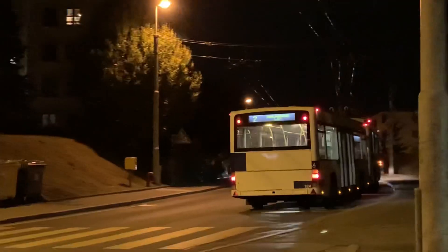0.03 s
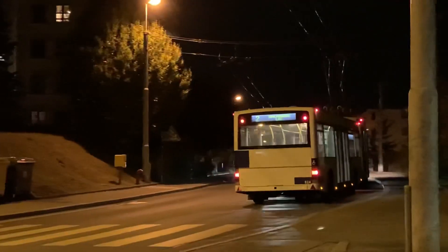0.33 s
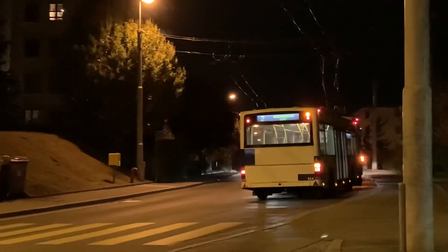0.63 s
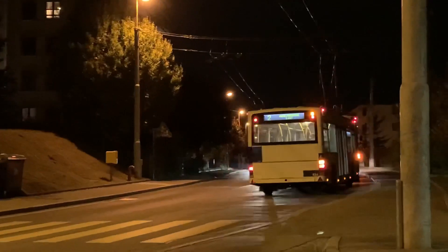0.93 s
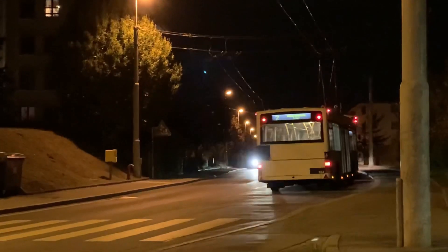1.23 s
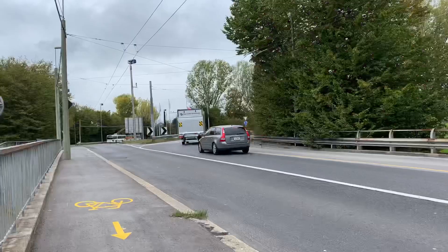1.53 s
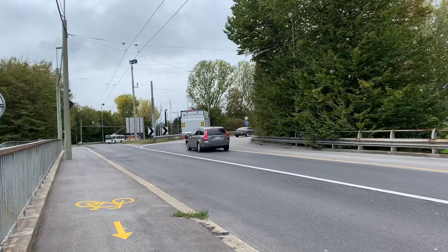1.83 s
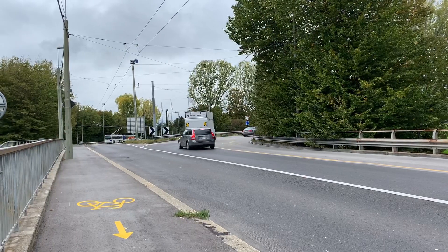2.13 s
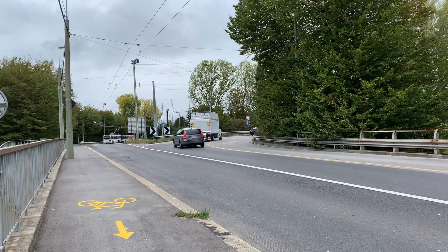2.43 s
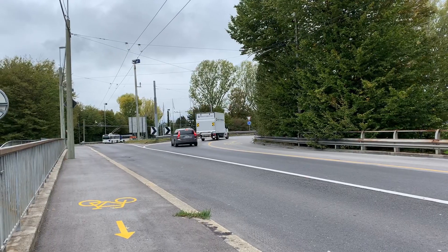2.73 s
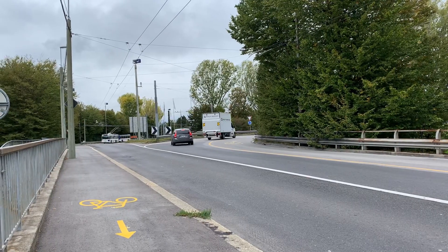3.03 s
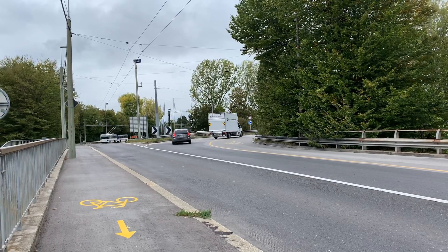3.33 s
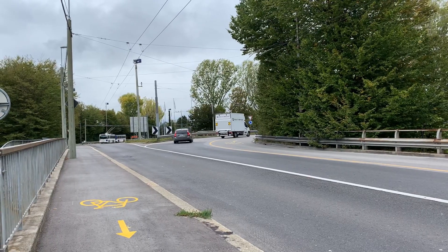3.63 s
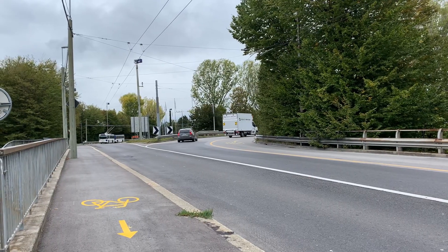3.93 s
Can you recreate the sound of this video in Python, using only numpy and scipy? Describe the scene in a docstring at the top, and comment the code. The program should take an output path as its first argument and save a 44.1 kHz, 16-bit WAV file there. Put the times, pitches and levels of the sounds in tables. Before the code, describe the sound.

Vehicles drive away from a listener at the roadside: first a trolleybus, humming and hissing with a high whine and swelling motor tones, then, after an abrupt cut, a louder car and truck with rumbling engines and slowly receding tyres.

```python
"""A low rumble and hum at night: a trolleybus pulls away, heard from the pavement, with tyre wash,
swelling motor tones, drive hiss and a thin inverter whine. A short silence follows.
Then, by day, a car and a box truck drive off: receding tyre roar over engine drones, road rumble,
a hollow boom and fine hiss. Rumble, roar and hiss are shaped stereo noise; engines are harmonics
of a firing rate; the electric drive is a set of wavering sines."""
import sys
import numpy as np
from scipy import signal
from scipy.fft import rfft, irfft
from scipy.io import wavfile
from scipy.ndimage import uniform_filter1d

SR = 44100
rng = np.random.default_rng(int(sys.argv[2]) if len(sys.argv) > 2 else 0)


def output_pcm(signal):
    """Save a mono or channel-first signal as 16-bit PCM at the path in sys.argv[1].

    Samples are clipped to [-1, 1] before scaling.
    """
    pcm = np.clip(np.atleast_2d(signal).T, -1, 1) * 32767
    wavfile.write(sys.argv[1], SR, np.round(pcm).astype(np.int16))


N = 176400
T = np.arange(N) / SR
NIGHT_END_S, DAY_START_S = 1.274, 1.349
LOW_CUT_HZ, HIGH_CUT_HZ = 37, 14300

# noise spectra (frequency [Hz], relative density [dB])
BUS_RUMBLE_SPECTRUM = [(15, -42), (28, -30), (50, -3.5), (80, 1), (125, -2.5), (155, -5.5), (200, -8),
                       (340, -14), (450, -24), (900, -33), (3000, -76)]
BUS_TYRE_SPECTRUM = [(150, -20), (450, -8.5), (720, 1.5), (860, -1), (1060, -9.5), (1250, -1), (1430, -5),
                     (1750, -10.5), (2150, -10.5), (2450, -16), (3600, -13.5), (4300, -16), (8000, -25.5),
                     (14000, -61)]
DRIVE_HISS_SPECTRUM = [(1500, -39), (2500, -5.5), (3000, 3), (3700, 3), (4100, -5.5), (5000, -14),
                       (6400, -7.5), (8500, -11), (10600, -9), (11600, -35), (13300, -18), (14300, -34)]
ROAD_RUMBLE_SPECTRUM = [(15, -29), (28, -20), (36, 1.5), (60, 5.5), (100, 1), (150, -1.5), (200, -5.5),
                        (290, -5), (360, -6.5), (470, -14), (700, -20.5), (2000, -64.5)]
TYRE_ROAR_SPECTRUM = [(150, -23), (450, -12.5), (640, -0.5), (850, -0.5), (1020, 0), (1220, -1),
                      (1400, -1.5), (1620, -2), (1870, -3), (2150, -5.5), (2480, -9), (2660, -9.5),
                      (2880, -12.5), (3120, -12.5), (3800, -16.5), (4150, -15.5), (4800, -24),
                      (7000, -27.5), (14000, -62)]
TREAD_RING_SPECTRUM = [(950, -47), (1150, 0), (1340, 0), (1500, -12), (1700, -6), (1870, 0), (2100, -20),
                       (2600, -52), (5000, -85)]
FAR_ROAR_SPECTRUM = [(250, -34), (450, 3), (530, -1), (620, -10), (1000, -11), (1800, -59)]
FINE_HISS_SPECTRUM = [(1500, 0), (3500, 1.5), (6200, 7), (7300, -1.5), (8200, 8.5), (9100, 1.5),
                      (10500, 5.5), (11500, -18), (13400, -0.5), (14300, -22)]
BOOM_SPECTRUM = [(100, -23), (150, -0.5), (215, -0.5), (275, 3.5), (330, -5.5), (450, -35), (1200, -92)]
# stereo fields (frequency [Hz], coherence [0-1], left lead [rad], left-right [dB])
NIGHT_FIELD = [(100, 0.99, -0.39, -0.5), (300, 0.91, 0.25, -4), (520.2, 0.5, 0, 3.5), (800, .75, 0.1, -1.5),
               (1050, .1, -0.15, 4.5), (1350, 0.84, -0.15, 0), (1690, 0.43, -1.5, 0.5),
               (2100, .6, -0.33, -.5), (2610, 0.32, -0.79, -1), (3400, .25, 0.47, 2.5),
               (3900, 0.26, -0.08, 0), (5200, .2, -2.2, -1.5), (6460, .35, 0, -1.5),
               (9000, 0.32, -2.2, -.5), (10900, 0.27, 0.91, 0)]
DAY_FIELD = [(80, 0.99, 0.2, 0.5), (180, 0.82, 0.2, -1), (294, 0.67, -0.74, -1.7), (447, 0.11, 0.57, 1),
             (534, 0.13, 2, 0.8), (857, 0.25, 2, 0.5), (1020, 0.39, 3.5, 4), (1186, 0.12, 1, 5.5),
             (1380, 0.19, 0, 6), (1490, 0.69, 2.5, 1), (1860, .33, 1.6, -1), (2220, 0.19, 2.5, 2.5),
             (2660, 0.28, -0.7, -0.5), (3160, 0.5, 4.5, 1), (4200, 0.4, 5.5, 0), (5300, 0.099, 7.5, -1.5),
             (7140, 0.34, 8, -1), (8000, 0.17, 7, -5.5), (9030, 0.23, 3, -.4), (10040, 0.54, 7, 0),
             (13300, 0.55, 7, 0)]
# hum, engine and drone tracks (time [s], fundamental [Hz], base level [dB])
BUS_HUM_TRACK = [(0, 63.4, -46), (.35, 63.1, -47.5), (.5, 62.3, -50), (.75, 62.1, -49), (1.27, 61.4, -55)]
TRUCK_TRACK = [(1.35, 62.44, -32), (1.55, 62.34, -36.5), (1.85, 63.12, -39.5), (2.3, 66.23, -34),
               (2.7, 67.4, -39), (3.1, 69.86, -39), (3.55, 73.2, -35), (3.75, 72.97, -40.5), (4, 71, -36)]
CAR_TRACK = [(1.35, 96.6, -54), (1.7, 93.1, -41.5), (2.05, 91.03, -39.5), (2.5, 88.17, -50.5),
             (2.9, 94, -37), (3.2, 92.92, -37.5), (3.55, 87.83, -42), (4, 86.8, -37.5)]
LOW_DRONE_TRACK = [(1.35, 318, -48), (1.8, 314, -59), (2.2, 314.7, -52), (2.7, 315.3, -54),
                   (2.9, 315.9, -42.5), (3.15, 317.6, -52.5), (3.42, 318, -41.5), (3.6, 319, -55.5),
                   (3.76, 324, -43), (4, 317, -54)]
HIGH_DRONE_TRACK = [(1.35, 402, -56), (1.65, 376, -53), (1.9, 380, -68), (2.15, 425, -66),
                    (2.35, 426, -55.5), (2.8, 424, -61), (3.2, 422, -54), (4, 424, -56)]
# harmonics (multiple, gain [dB])
BUS_HUM_ORDERS = [(1, -9), (2, -1.5), (3, -7.5)]
TRUCK_ORDERS = [(1, 0), (2, -18), (3, -16), (4, -20.5), (5, -21)]
CAR_ORDERS = [(1, -0.5), (2, -18.5), (3, -16.5), (4, -20)]

# bus noise levels (time [s], rumble [dB], tyres [dB], hiss [dB])
BUS_LEVELS = [(0, -44, -51, -61.5), (.15, -40, -51, -57.5), (.35, -43, -50, -58.5),
              (.65, -42.5, -49.5, -56), (.8, -42, -51.5, -59), (.98, -43, -51.5, -61),
              (1.1, -42.5, -51, -62), (1.27, -45, -52.5, -65)]
# traction motor tones (frequency [Hz], base level [dB])
MOTOR_TONES = [(286, -57.5), (431, -63), (495, -62.5), (577, -58.5), (802, -72)]
# their swell (time [s], gain [dB])
MOTOR_SWELL = [(.9, -25), (1.02, -4.5), (1.1, 2), (1.27, -1.5)]
# inverter main tone (time [s], level [dB])
INVERTER_LEVEL = [(0, -58.5), (.07, -65), (.17, -59), (.3, -59), (.45, -65), (.57, -62.5), (.66, -66),
                  (.73, -62), (.93, -62), (1.05, -72), (1.27, -72)]
# drive tones (frequency [Hz], start level [dB], slope [dB/s], left-right [dB], left lead [rad])
DRIVE_TONES = [(2994, -70.5, -2, 3, 0.47), (3460, -73, -8, 5, 1), (3640, -71, -3, 4, -0.88),
               (6492, -76, -4, 0, 0)]
# switching tones (frequency [Hz], level re drive hiss [dB])
SWITCHING_TONES = [(7420, -27), (7641, -29), (10201, -26), (10700, -24), (10890, -21)]

# traffic noise levels (time [s], rumble [dB], tyres [dB], tyre tilt [dB/octave], hiss [dB])
TRAFFIC_LEVELS = [(1.35, -30, -36.5, -0.5, -57.5), (1.6, -31.5, -37.5, -0.9, -59.5),
                  (1.9, -32, -37.5, -1, -60), (2.25, -30, -40, 0.5, -62.5), (2.6, -31, -40.5, -1.05, -60),
                  (2.9, -32, -40, -1.5, -61), (3.3, -31, -42, -0.6, -60.5),
                  (3.44, -34.5, -41.5, -1.5, -57.5), (3.6, -32, -40.5, -1.5, -60.5),
                  (3.76, -32, -41, -1.6, -58), (4, -32, -41.5, -0.6, -62.5)]
# treads and far traffic (time [s], ring [dB], far roar [dB])
RING_AND_FAR_LEVELS = [(1.35, -44.5, -62), (1.9, -44.5, -55), (2.3, -46.5, -58), (2.65, -48.5, -61),
                       (3, -52.5, -54), (4, -64, -54.5)]
# vehicle boom (time [s], level [dB])
BOOM_LEVEL = [(1.35, -48), (1.85, -47), (2.25, -41.5), (2.55, -43), (2.8, -49.5), (4, -47)]


def amp(db):
    """Decibels to gain."""
    return 10 ** (np.asarray(db) / 20)


def unit(x):
    """Scale to rms 1."""
    return x / np.sqrt(np.mean(abs(x) ** 2) + 1e-20)


def over_hz(table, hz):
    """Table columns interpolated over log frequency."""
    knots_hz, *columns = np.transpose(table)
    return [np.interp(np.log(hz + 1), np.log(knots_hz + 1), c) for c in columns]


def over_time(table):
    """Table columns interpolated over T."""
    knots_s, *columns = np.transpose(table)
    return [np.interp(T, knots_s, c) for c in columns]


def wander(rate_hz):
    """Slow random motion, rms 1."""
    hz = np.fft.rfftfreq(N, 1 / SR)
    return unit(irfft(rfft(rng.standard_normal(N)) * np.exp(-(hz / rate_hz) ** 2), N))


def noise(spectrum, field, patchy_db, tilt_db_oct=0 * T, size=2048):
    """Shaped stereo noise, rms 1, with drifting spectral patches and a tilt about 1 kHz."""
    hop = size // 4
    frames, hz = N // hop + 5, np.fft.rfftfreq(size, 1 / SR)
    a, b, c, d, patches = rng.standard_normal((5, frames, len(hz)))
    patches = unit(uniform_filter1d(uniform_filter1d(patches, size=10, axis=0), size=9, axis=1))
    coherence, lead_rad, balance_db = over_hz(field, hz)
    left, diffuse = a + 1j * b, c + 1j * d
    right = (coherence * left + np.sqrt(1 - coherence ** 2) * diffuse) * np.exp(-1j * lead_rad)
    octaves = np.log2(np.maximum(hz, 200) / 1000)
    tilt_db = np.interp(np.arange(frames) * hop / SR, T, tilt_db_oct)[:, None] * octaves
    shape = amp(over_hz(spectrum, hz)[0] + patchy_db * patches + tilt_db)
    bins = np.array([left * amp(balance_db / 2), right * amp(-balance_db / 2)]) * shape
    return unit(signal.istft(bins.swapaxes(1, 2), nperseg=size, noverlap=size - hop)[1][:, :N])


def tone(turns, balance_db, lead_rad):
    """Stereo sine, rms near 1; positive balance and lead favour the left."""
    angle = 2 * np.pi * turns
    left = amp(balance_db / 2) * np.sin(angle + lead_rad)
    right = amp(-balance_db / 2) * np.sin(angle)
    return np.sqrt(2) * np.array([left, right])


def harmonics(track, orders=((1, 0),), *, waver, flutter_db):
    """Multiples of a fundamental, each throbbing by itself; waver is the rms fraction of pitch."""
    hz, level_db = over_time(track)
    turns = np.cumsum(hz * (1 + waver * wander(15))) / SR
    out = 0
    for multiple, gain_db in orders:
        gain = amp(level_db + gain_db + flutter_db * wander(14.4))
        out += gain * tone(multiple * turns + rng.random(), balance_db=-1.9, lead_rad=-0.33)
    return out


def whine(hz, level_db, balance_db, lead_rad, waver=0.0012, flutter_db=1):
    """One thin electric tone, fluttering among the street's reflections."""
    turns = np.cumsum(hz * (1 + waver * wander(20))) / SR
    return amp(level_db + flutter_db * wander(14)) * tone(turns, balance_db, lead_rad)


def bus_noise():
    """Body rumble, tyre wash and a drive hiss that fades as the bus turns away."""
    rumble_db, tyres_db, hiss_db = over_time(BUS_LEVELS)
    rumble = amp(rumble_db) * noise(BUS_RUMBLE_SPECTRUM, NIGHT_FIELD, patchy_db=1.5, size=4096)
    tyre_gain = amp(tyres_db + 0.66 * wander(25))
    tyres = tyre_gain * noise(BUS_TYRE_SPECTRUM, NIGHT_FIELD, patchy_db=1.5, size=1024)
    hiss = amp(hiss_db + 0.53 * wander(60)) * noise(DRIVE_HISS_SPECTRUM, NIGHT_FIELD, patchy_db=3)
    return rumble + tyres + hiss


def bus_hum():
    """Machinery hum near 62 Hz."""
    return harmonics(BUS_HUM_TRACK, BUS_HUM_ORDERS, waver=0.0055, flutter_db=2)


def inverter(main_hz=2000):
    """Main tone, fading drive tones and switching tones that follow the drive hiss."""
    out = whine(main_hz, over_time(INVERTER_LEVEL)[0], balance_db=-1, lead_rad=-1.1)
    for hz, start_db, slope_db_s, balance_db, lead_rad in DRIVE_TONES:
        out += whine(hz, start_db + slope_db_s * T, balance_db, lead_rad)
    hiss_db = over_time(BUS_LEVELS)[2]
    for hz, gain_db in SWITCHING_TONES:
        out += whine(hz, hiss_db + gain_db, balance_db=-2, lead_rad=rng.uniform(-np.pi, np.pi))
    return out


def traction_motor():
    """Tones that swell as the bus gathers speed."""
    out = 0
    for hz, base_db in MOTOR_TONES:
        track = [(time_s, hz, base_db + swell_db) for time_s, swell_db in MOTOR_SWELL]
        out += harmonics(track, waver=0.008, flutter_db=2.5)
    return out


def road_noise():
    """Road rumble, tyre roar that dulls with distance, ringing treads, far traffic and fine hiss."""
    rumble_db, tyres_db, tyre_tilt_db_oct, hiss_db = over_time(TRAFFIC_LEVELS)
    ring_db, far_db = over_time(RING_AND_FAR_LEVELS)
    rumble = amp(rumble_db) * noise(ROAD_RUMBLE_SPECTRUM, DAY_FIELD, patchy_db=1.5, size=4096)
    tyre_gain = amp(tyres_db + 0.34 * wander(40))
    tyres = noise(TYRE_ROAR_SPECTRUM, DAY_FIELD, patchy_db=1.55, tilt_db_oct=tyre_tilt_db_oct)
    ring = amp(ring_db) * noise(TREAD_RING_SPECTRUM, DAY_FIELD, patchy_db=0.5)
    far = amp(far_db) * noise(FAR_ROAR_SPECTRUM, DAY_FIELD, patchy_db=-2)
    hiss_gain = amp(hiss_db + 0.66 * wander(80))
    hiss = noise(FINE_HISS_SPECTRUM, DAY_FIELD, patchy_db=1.3, tilt_db_oct=0.4 * (T - 3.5), size=1024)
    return rumble + tyre_gain * tyres + ring + far + hiss_gain * hiss


def engines():
    """Truck and car: harmonics of each firing rate."""
    truck = harmonics(TRUCK_TRACK, TRUCK_ORDERS, waver=0.03003, flutter_db=1)
    car = harmonics(CAR_TRACK, CAR_ORDERS, waver=0.01255, flutter_db=4)
    return truck + car


def drones():
    """Two tones in the traffic, the higher one fainter."""
    low = harmonics(LOW_DRONE_TRACK, waver=0.01375, flutter_db=2.1)
    high = harmonics(HIGH_DRONE_TRACK, waver=0.0066, flutter_db=4)
    return low + high


def boom():
    """Hollow boom of the vehicles, about 150-300 Hz."""
    return amp(over_time(BOOM_LEVEL)[0]) * noise(BOOM_SPECTRUM, DAY_FIELD, patchy_db=1, size=4096)


def scene():
    """Night street stops short; silence; day street starts at once. Both high-passed."""
    low_cut = signal.butter(N=6, Wn=LOW_CUT_HZ, btype="high", fs=SR, output="sos")
    night = signal.sosfilt(low_cut, bus_noise() + bus_hum() + traction_motor() + inverter())
    day = signal.sosfilt(low_cut, road_noise() + engines() + drones() + boom())
    night_gate = np.clip((NIGHT_END_S - T) / 0.0035, 0, 1)
    day_gate = np.clip((T - DAY_START_S) / 0.0015, 0, 1)
    return night_gate * night + day_gate * day


def record(dry):
    """Steep low-pass at HIGH_CUT_HZ."""
    taps = signal.firwin(511, HIGH_CUT_HZ, window=("kaiser", 9), fs=SR)
    return signal.oaconvolve(dry, taps[None], "same")


dry = scene()
out = record(dry)
output_pcm(out)
```